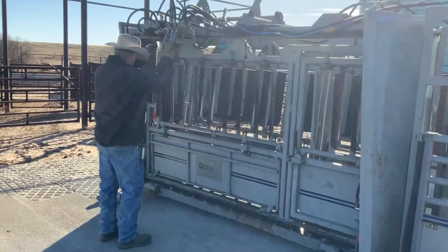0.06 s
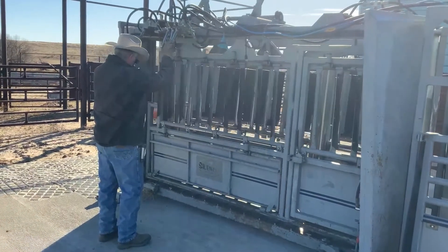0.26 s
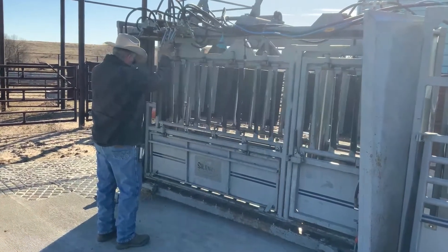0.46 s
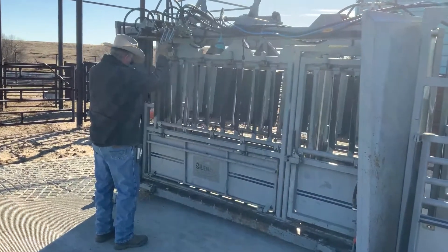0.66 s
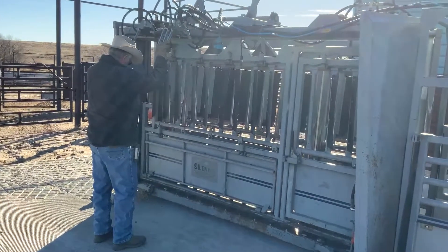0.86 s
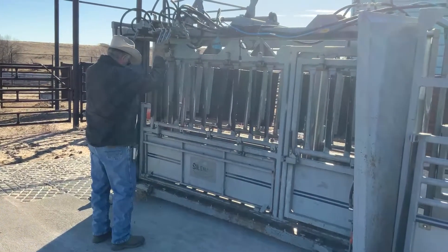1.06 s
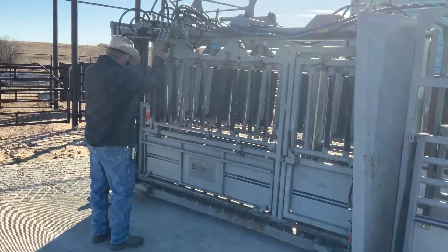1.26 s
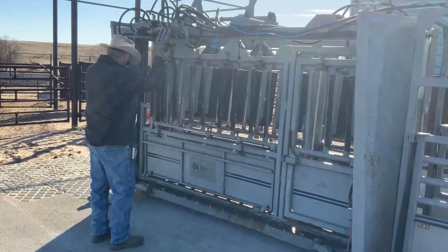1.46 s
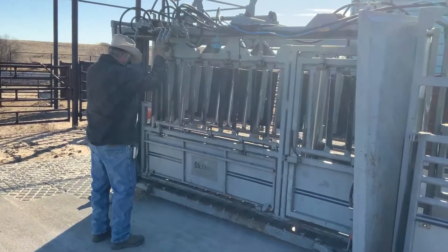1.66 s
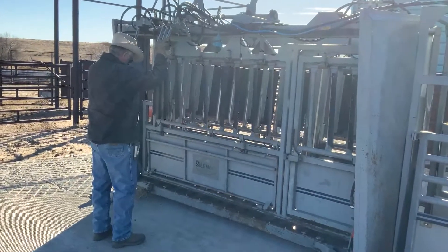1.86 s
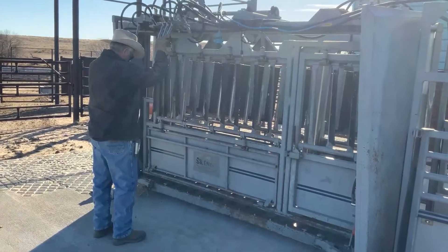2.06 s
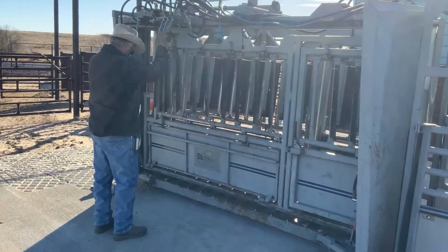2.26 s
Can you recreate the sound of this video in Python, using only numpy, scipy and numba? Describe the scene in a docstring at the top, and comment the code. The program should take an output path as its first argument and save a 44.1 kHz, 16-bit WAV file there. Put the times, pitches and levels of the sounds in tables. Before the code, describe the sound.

A steel cattle chute clatters outdoors. After a faint chain jingle, its loose bars rattle and ring from about 0.2 to 0.7 seconds, while wind buffets the microphone, hardest until about 1 second. From 1.2 seconds the gate slides with a grinding scrape and short, high squeaks. It rattles home with several quick knocks around 1.8 seconds, and the frame rings on over a faint low rumble.

```python
"""Wind buffets the microphone over a faint chain jingle; then the loose bars of a cattle chute clatter.
The hydraulic steel chute stands in an open yard. Its gate slides with a grinding hiss, squeaks by
stick-slip on dry steel and rattles home. The heavy frame rings on under light latch ticks.
Each blow excites a crack, a dense tail and a few clear modes; the wind is low-passed turbulence."""
import sys
import numpy as np
from scipy import signal
from scipy.fft import rfft, irfft
from scipy.io import wavfile
from scipy.ndimage import uniform_filter1d
from numba import njit

SR = 44100
rng = np.random.default_rng(int(sys.argv[2]) if len(sys.argv) > 2 else 0)


def output_pcm(signal):
    """Save a mono or channel-first signal as 16-bit PCM at the path in sys.argv[1].

    Samples are clipped to [-1, 1] before scaling.
    """
    pcm = np.clip(np.atleast_2d(signal).T, -1, 1) * 32767
    wavfile.write(sys.argv[1], SR, np.round(pcm).astype(np.int16))


N = 101429
FFT_SIZE = 2 ** 17

# blows of gate on frame, and of loose bars: t/s, level/dB, treble gain/dB, chatter decay/s
GATE_BLOWS = [(1.724, -24.5, -9, 0.0051), (1.738, -23, 6.5, 0.0074), (1.754, -21.5, -2, 0.013),
              (1.768, -23.5, -4, 0.0078), (1.778, -23.5, -5, 0.005), (1.788, -21, -3, 0.0047),
              (1.805, -24.5, -25, 0.017), (1.858, -33.5, -26, 0.015), (1.925, -36, 0.5, 0.022)]
BAR_BLOWS = [(.228, -35, 5, 0.016), (.257, -27.5, -2.5, 0.0014), (.271, -21, 4.5, 0.0047),
             (.277, -13.5, -7.5, 0.0025), (.288, -40, -0.5, 0.0021), (.332, -34, 2.5, .002),
             (.357, -28, -5, 0.018), (.377, -25, -7.5, 0.0038), (.384, -22, -14.5, 0.002),
             (.408, -42, 4.5, 0.006), (.436, -30, -24, 0.029), (.454, -34, -14, 0.016),
             (.478, -45.5, -2.5, 0.011), (.503, -44.5, -6, 0.0027), (.511, -30, -11.5, 0.0062),
             (.529, -44.5, -2, 0.007), (.574, -57.5, 13, .005), (.61, -39, 6, 0.009),
             (.625, -41, -1, 0.0062), (.635, -30, 2, 0.0017), (.652, -34, -26, .006),
             (.714, -51.5, 5, .003)]
# spectra of struck steel: f/Hz, relative density/dB
FRAME_SPECTRUM = [(25, -27), (70, 8), (170, 7), (330, -7.5), (560, -2.5), (720, -10), (1050, -0.5),
                  (1600, -10.5), (2500, -16.5), (4000, -30.5), (8000, -39), (16000, -82)]
BAR_SPECTRUM = [(60, -26), (200, 2), (550, 4), (900, 2), (1200, 0.5), (1800, 0.5), (3100, -3.5),
                (4300, -15.5), (6000, -17.5), (9000, -22), (16000, -34)]
CHAIN_SPECTRUM = [(1500, -10.5), (4000, -4.5), (6500, -9.5), (8500, 2), (11000, -1), (14000, 5),
                  (16000, -12.5)]
CLICK_SPECTRUM = [(1500, -1), (3500, 0), (7000, 0.5), (11000, -3.5), (16000, -5.5)]
# decay of the dense tails: f/Hz, T60/s
FRAME_DECAY = [(100, 1.25), (1000, 1.4), (2000, 0.32), (4000, 0.62), (16000, 0.23)]
BAR_DECAY = [(200, 1), (1500, 1), (3000, 0.32), (6000, 0.43), (16000, 0.16)]
# clear modes: f/Hz, relative level/dB, T60/s
FRAME_PARTIALS = [(168, 5.5, .7), (250.4, 7.5, 1.41), (498, -7, 1.5), (576, -7.5, 3.3), (827, 0, 1.5),
                  (841, -5.5, 0.3), (887.3, 5, 1.2), (1040, 1, 1.6), (1073, -2, 1.8), (1100, -13, .6),
                  (1280, -8.5, 0.23), (1327, -9, 0.92), (1292, 7, .5), (1528, 6.5, 0.52)]
BAR_PARTIALS = [(890, -5, .45), (1234, -4, .55), (1523, -5, .55), (1794, -2, .5), (1870, -3, .5),
                (2083, -4, .5), (2272, -2, .5), (2493, -2, .35), (2842, 2, .3), (2992, 0, .3),
                (3283, -1, .25), (3622, -1, .28)]
LATCH_PARTIALS = [(3283, -3, 0.24), (3850, -13, 0.23), (4840, -2.5, 0.064), (5900, -13, 0.12),
                  (7200, -13.5, 0.12)]
# dry steel squeaks: t/s, length/s, f/Hz, level/dB, roughness/0-1
GATE_SQUEAKS = [(1.335, .13, 2630, -54, .8), (1.474, .048, 2638, -29, .25), (1.478, .024, 985, -41, .8),
                (1.51, .03, 2570, -36, .9), (1.543, .03, 2790, -37, .3), (1.655, .04, 1000, -45, .9),
                (1.684, .06, 1005, -35, .8), (1.709, .027, 2478, -18.5, .35),
                (1.742, .022, 2466, -20.5, .5)]
# squeak overtones at zero roughness: harmonic number, level/dB re fundamental
SQUEAK_OVERTONES = [(2, -31), (3, -23), (4, -33), (6, -32)]
# grinding of the sliding gate: t/s, level/dB
SLIDE_ENVELOPE = [(1.12, -82.5), (1.2, -56), (1.26, -41), (1.3, -48), (1.37, -41.5), (1.45, -41.5),
                  (1.5, -33.5), (1.6, -40), (1.67, -40), (1.72, -32), (1.8, -36), (1.9, -82)]
# hiss where the gate catches: t/s, level/dB, length/s
HISS_SPURTS = [(1.249, -51.5, 0.039), (1.315, -56, 0.011), (1.344, -51.5, 0.0046), (1.504, -36.5, 0.01),
               (1.544, -43, 0.01)]
# spectra of rubbing steel: f/Hz, relative density/dB
SCRAPE_SPECTRUM = [(150, 14), (350, -1.5), (520, 6), (700, 4.5), (980, 3.5), (1300, -1.5), (2000, -3),
                   (2650, -5.5), (3500, -14.5), (5000, -20), (9000, -24.5), (16000, -35)]
HISS_SPECTRUM = [(2500, 5.5), (5400, -1), (6200, 9.5), (6900, 3), (7700, 11), (8500, 2.5), (10000, 1.5),
                 (13500, 3.5), (15000, 11), (16000, 6)]
# light contacts of latch, chain and bare edges: t/s, level/dB
LATCH_TICKS = [(1.918, -50.5), (2.105, -78), (2.143, -71.5), (2.193, -72)]
CHAIN_JINGLES = [(.025, -63.5), (.045, -61), (.086, -58.5), (.104, -61.5), (.126, -60), (.168, -60),
                 (.88, -75), (.953, -68)]
EDGE_CLICKS = [(.257, -24.5), (.354, -38), (.360, -28.5), (.503, -49), (.610, -40), (1.343, -38.5),
               (1.737, -53)]
# wind gusts: t/s, relative level/dB, nominal cutoff/Hz
WIND_GUSTS = [(0, -32, 205), (.04, -31.5, 182), (.11, -35, 198), (.17, -54.5, 217), (.23, -20.5, 550),
              (.45, -27, 714), (.52, -25.5, 607), (.64, -23.5, 700), (.78, -28, 370), (.87, -27, 423),
              (.93, -21, 1200), (.975, -25, 1000), (.995, -23, 560), (1.025, -21, 710), (1.065, -31.5, 620),
              (1.095, -38, 320), (1.13, -27, 293), (1.18, -26, 420), (1.24, -30.5, 330),
              (1.275, -37.5, 224), (1.34, -27, 248), (1.41, -60, 264), (1.58, -43.5, 224),
              (1.66, -31.5, 173), (1.78, -24.5, 149), (1.88, -46, 210), (2.2, -43.5, 156), (2.27, -30, 130),
              (2.3, -56, 126)]
# strong eddies on the microphone: t/s, peak level/dB, cutoff/Hz
EDDY_THUMPS = [(.192, -25, 550), (0.221, -16.5, 675), (0.332, -9, 670), (0.405, -14.5, 600),
               (0.459, -11.5, 650), (0.595, -13, 690), (.623, -9.5, 300), (0.637, -6, 760),
               (0.707, -15, 730), (0.746, -12.5, 694), (0.8, -19, 600), (.864, -19, 500), (0.904, -6, 620),
               (0.922, -13, 1600), (.942, -14.5, 1500), (0.96, -8, 980), (0.963, -20.5, 1300),
               (1.005, -21, 1100), (1.022, -16.5, 1020), (1.045, -27, 1110), (1.153, -20.5, 750),
               (1.216, -23, 514), (1.302, -23, 195), (1.339, -26, 300), (1.367, -26, 644),
               (1.582, -21.5, 244), (1.939, -21, 240)]
# spectra of unfiltered turbulence and yard rumble: f/Hz, relative density/dB
WIND_SPECTRUM = [(25, -37.5), (45, -8.5), (75, 1), (140, 1.5), (260, -3), (550, -9.5), (1200, -14),
                 (4000, -36.5)]
YARD_SPECTRUM = [(25, -17), (55, -2.5), (200, 2), (600, -18.5), (1500, -28), (3000, -38.5), (8000, -50.5),
                 (16000, -59.5)]


def gate():
    """The gate knocks into the frame several times and leaves it ringing."""
    return strike(GATE_BLOWS, FRAME_SPECTRUM, FRAME_DECAY, FRAME_PARTIALS,
                  crack_t60_s=0.23, tail_db=-15, mode_db=-13.5, treble_hz=3860, bounce=1.42)


def bars():
    """Loose side bars clatter and ring."""
    return strike(BAR_BLOWS, BAR_SPECTRUM, BAR_DECAY, BAR_PARTIALS,
                  crack_t60_s=0.097, tail_db=-20, mode_db=-17, treble_hz=4800, bounce=1.3)


def strike(blows, spectrum, decay, modes, crack_t60_s, tail_db, mode_db, treble_hz, bounce):
    """Blows on welded steel: a contact and its dying chatter excite a crack, a dense tail and modes."""
    t, hz = clock()[:SR // 10], np.fft.rfftfreq(FFT_SIZE, 1 / SR)
    dense = rfft(noise(spectrum), FFT_SIZE)
    octaves = []
    for low_hz in 32 * 2. ** np.arange(10):
        band = irfft(dense * (hz >= low_hz) * (hz < 2 * low_hz))[:N]
        tail = undb(tail_db) * fade(at_hz(decay, low_hz * np.sqrt(2)))
        octaves.append((band, fade(crack_t60_s) + tail))
    out = undb(mode_db) * driven_modes(blows, modes)
    for start_s, db, treble_db, chatter_s in blows:
        spot = rng.integers(N)  # each spot struck has its own fine colour
        body = sum(np.roll(band, spot) * envelope for band, envelope in octaves)
        contact = rng.laplace(size=len(t)) * np.exp(-t / chatter_s)
        contact *= bounce / np.linalg.norm(contact)
        contact[0] += 1  # first impact
        contact /= np.linalg.norm(contact)
        force = cut(contact, treble_hz, "low") - undb(treble_db) * cut(contact, treble_hz, "high")
        add(out, start_s, undb(db) * signal.fftconvolve(force, body)[:N])
    return out


def driven_modes(blows, modes, rise_s=0.004):
    """Each blow adds energy to the modes, which lose it at their own rates."""
    energy, t = np.zeros(N), clock()
    for start_s, db, _, _ in blows:
        add(energy, start_s, np.array([undb(db) ** 2]))
    energy = np.maximum(uniform_filter1d(energy, int(rise_s * SR)), 0)
    out = 0
    for hz, db, t60_s in modes:
        retention = undb(-120 / (t60_s * SR))  # energy kept per sample
        stored = signal.lfilter([1], [1, -retention], energy)
        out += undb(db) * np.sqrt(stored) * np.sin(2 * np.pi * (hz * t + rng.random()))
    return out / modes_rms(modes)


def squeaks(attack_s=0.023, release_s=0.011, wobble=0.026, rasp_db=6, flutter_db=5.5,
            echo_db=-12, echo_t60_s=0.28):
    """Stick-slip locks on to a resonance, overtones growing with roughness; steel panels echo it."""
    out, t = np.zeros(N), clock()
    for start_s, length_s, hz, db, rough in GATE_SQUEAKS:
        phase = 2 * np.pi * np.cumsum(hz * (1 + wobble * rough * walk(500))) / SR
        overtones = sum(undb(level_db) * np.sin(k * phase) for k, level_db in SQUEAK_OVERTONES)
        tone = np.sin(phase) + undb(rasp_db * rough) * overtones
        flutter = undb(flutter_db * rough * walk(250))
        envelope = np.minimum(t / attack_s, 1) ** 2 * np.exp(-np.maximum(t - length_s, 0) / release_s)
        add(out, start_s, undb(db) * envelope * unit(tone * flutter))
    echo = rng.standard_normal(N) * fade(echo_t60_s)
    return out + undb(echo_db) * signal.fftconvolve(out, echo / np.linalg.norm(echo))[:N]


def slide(grain_db=2.3, uneven_db=0.5, attack_s=0.0018, release_s=0.019):
    """Steel grinds on steel in fine grains, with spurts of hiss where it catches."""
    t = clock()
    grains = rng.standard_normal(N) * undb(grain_db * rng.exponential(size=N))
    moving = (t > SLIDE_ENVELOPE[0][0]) & (t < SLIDE_ENVELOPE[-1][0])
    out = colour(grains, SCRAPE_SPECTRUM) * undb(curve(SLIDE_ENVELOPE) + uneven_db * walk(60)) * moving
    hiss = noise(HISS_SPECTRUM)
    for start_s, db, length_s in HISS_SPURTS:
        attack = np.clip((t - start_s) / attack_s, 0, 1)
        release = np.exp(-np.maximum(t - start_s - length_s, 0) / release_s)
        out += undb(db) * hiss * attack * release
    return out


def latch(crack_db=-2, crack_t60_s=0.15):
    """The latch ticks: high modes over a short crack."""
    out, t = np.zeros(N), clock()
    for start_s, db in LATCH_TICKS:
        ring = sum(undb(mode_db) * np.sin(2 * np.pi * (hz * t + rng.random())) * fade(t60_s)
                   for hz, mode_db, t60_s in LATCH_PARTIALS)
        crack = undb(crack_db) * noise(BAR_SPECTRUM) * fade(crack_t60_s)
        add(out, start_s, undb(db) * (ring / modes_rms(LATCH_PARTIALS) + crack))
    return out


def taps(contacts, spectrum, t60_s):
    """Small steel parts touch: dense high partials that die fast, different each time."""
    out, cluster = np.zeros(N), noise(spectrum)
    for start_s, db in contacts:
        add(out, start_s, undb(db) * np.roll(cluster, rng.integers(N)) * fade(t60_s))
    return out


def wind(gain_db=4.5, eddy_rate_hz=75, eddy_db=2, cutoff_swing=0.26):
    """Turbulence at the microphone: each eddy makes it louder and brighter."""
    eddy = 2 * np.tanh(walk(eddy_rate_hz) / 2)
    cutoff_hz = np.clip(curve(WIND_GUSTS, column=2) * np.exp(cutoff_swing * eddy), 50, 5000)
    turbulence = lowpass(lowpass(noise(WIND_SPECTRUM), cutoff_hz), cutoff_hz)
    return turbulence * undb(curve(WIND_GUSTS) + gain_db + eddy_db * eddy)


def buffets(relax_s=0.0039, wake_gain=0.354, wake_s=0.0055, low_hz=100, top_hz=2200):
    """Strong eddies thump the microphone: band-limited pressure pulses with short turbulent wakes."""
    out, t = np.zeros(N), clock()[:SR // 10]
    for start_s, db, cutoff_hz in EDDY_THUMPS:
        swirl = cut(cut(rng.standard_normal(len(t)), cutoff_hz, "low"), cutoff_hz / 3, "high")
        pressure = np.exp(-t / relax_s) + wake_gain * unit(swirl) * np.exp(-t / wake_s)
        pulse = cut(cut(pressure, cutoff_hz, "low", order=5), low_hz, "high", order=3)
        add(out, start_s, -undb(db) * pulse / np.abs(pulse).max())
    return cut(out, top_hz, "low", order=6)


def yard(level_db=-50.5):
    """Steady low rumble of the yard."""
    return undb(level_db) * noise(YARD_SPECTRUM)


def undb(db):
    """Decibels to gain."""
    return 10 ** (np.asarray(db) / 20)


def unit(x):
    """Scale to rms 1."""
    return x / np.sqrt(np.mean(x ** 2))


def modes_rms(modes):
    """Rms of the summed modes before decay."""
    return np.sqrt(sum(undb(db) ** 2 for _, db, _ in modes) / 2)


def clock():
    """Sample times in s."""
    return np.arange(N) / SR


def curve(rows, column=1):
    """Table column, linearly interpolated in time."""
    rows = np.array(rows, float)
    return np.interp(clock(), rows[:, 0], rows[:, column])


def at_hz(rows, hz):
    """Table value, interpolated in log frequency."""
    rows = np.array(rows, float)
    return np.interp(np.log(np.maximum(hz, 1)), np.log(rows[:, 0]), rows[:, 1])


def colour(x, spectrum):
    """Filter by a spectrum; rms 1."""
    gain = undb(at_hz(spectrum, np.fft.rfftfreq(FFT_SIZE, 1 / SR)))
    return unit(irfft(rfft(x, FFT_SIZE) * gain)[:N])


def noise(spectrum):
    """Coloured noise, rms 1."""
    return colour(rng.standard_normal(N), spectrum)


def walk(rate_hz):
    """Smooth random drift, rms 1."""
    hold = int(SR / rate_hz)
    steps = np.repeat(rng.standard_normal(N)[:N // hold + 1], hold)
    return unit(uniform_filter1d(steps, hold)[:N])


def fade(t60_s):
    """Exponential decay, 60 dB in t60_s."""
    return undb(-60 * clock() / t60_s)


def add(out, start_s, x):
    """Mix x into out from start_s."""
    i = int(start_s * SR)
    out[i:i + len(x)] += x[:N - i]


def cut(x, hz, kind, order=2):
    """Butterworth low-pass or high-pass."""
    return signal.sosfilt(signal.butter(order, hz, kind, fs=SR, output="sos"), x)


@njit
def lowpass(x, cutoff_hz):
    """State-variable low-pass, moving cutoff."""
    y, band_state, low_state = np.empty(len(x)), 0., 0.
    for i in range(len(x)):
        g = np.tan(np.pi * cutoff_hz[i] / SR)
        band = (band_state + g * (x[i] - low_state)) / (1 + g * (g + 1.5))
        y[i] = low_state + g * band
        band_state, low_state = 2 * band - band_state, 2 * y[i] - low_state
    return y


def scene():
    """Chute, wind and yard rumble; mono."""
    ticks = latch()
    chain = taps(CHAIN_JINGLES, CHAIN_SPECTRUM, t60_s=0.14)
    clicks = taps(EDGE_CLICKS, CLICK_SPECTRUM, t60_s=0.0072)
    chute = bars() + gate() + slide() + squeaks() + ticks + chain + clicks
    return (chute + wind() + buffets() + yard())[None]


def record(dry):
    """Recorder passband: 32 Hz to 15.9 kHz."""
    top_cut = signal.ellip(10, 0.2, 80, 15900, fs=SR, output="sos")
    return signal.sosfilt(top_cut, cut(dry, 32, "high", order=3))


dry = scene()
out = record(dry)
output_pcm(out)
```